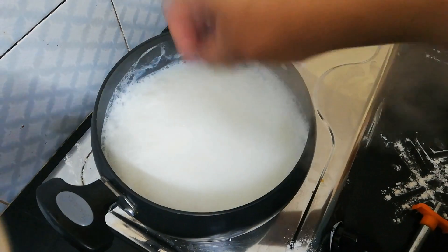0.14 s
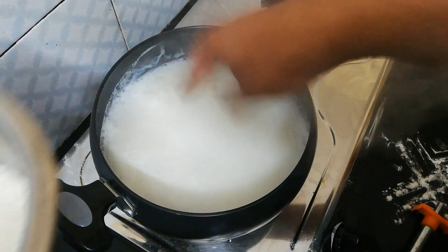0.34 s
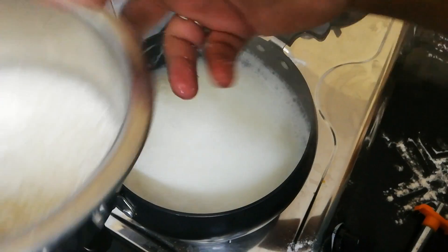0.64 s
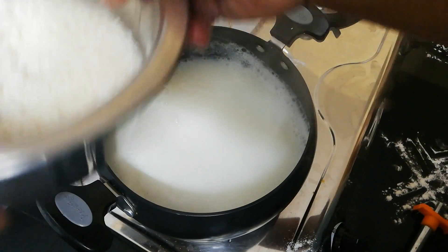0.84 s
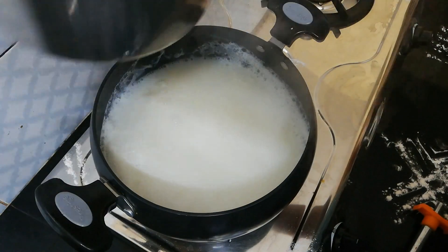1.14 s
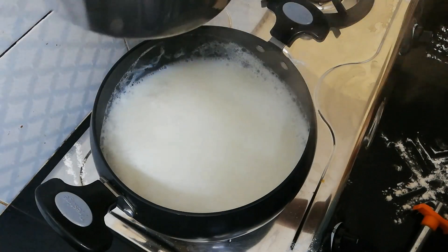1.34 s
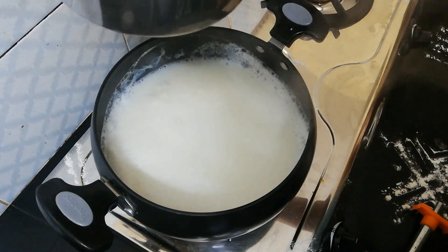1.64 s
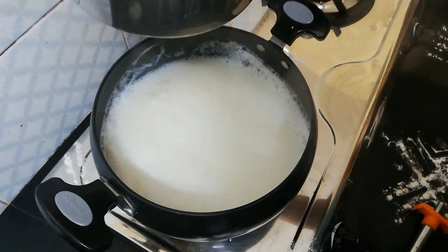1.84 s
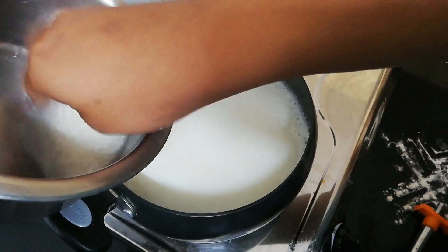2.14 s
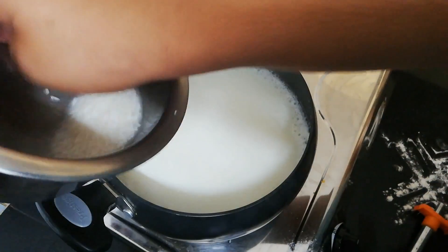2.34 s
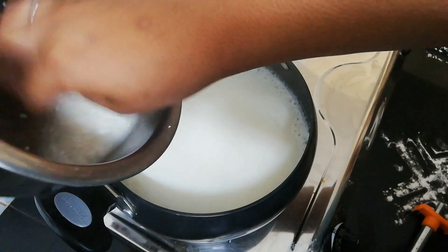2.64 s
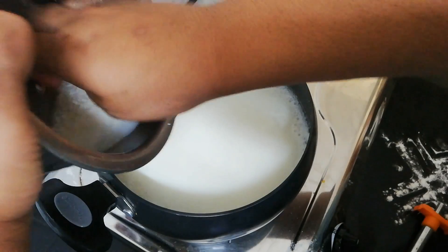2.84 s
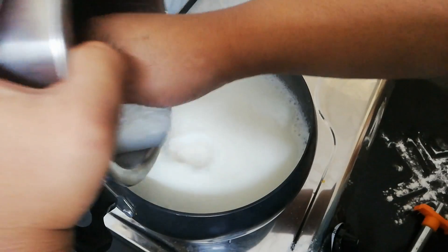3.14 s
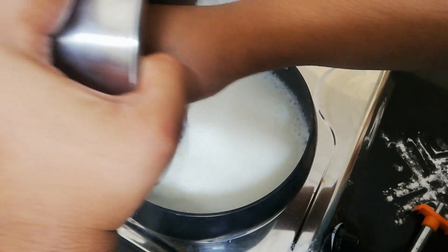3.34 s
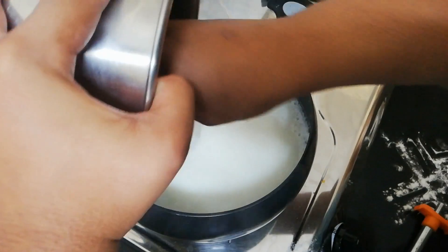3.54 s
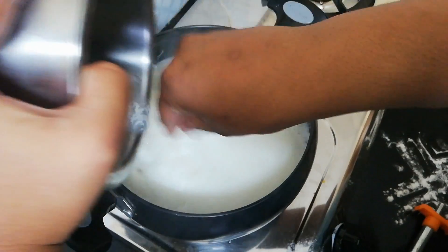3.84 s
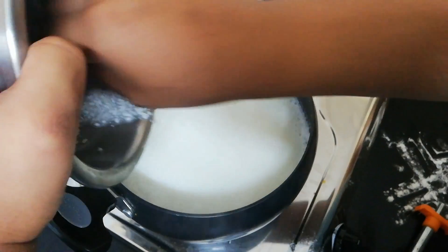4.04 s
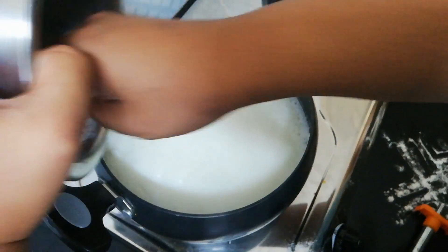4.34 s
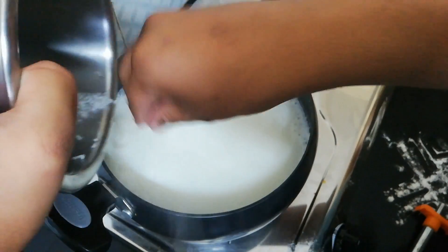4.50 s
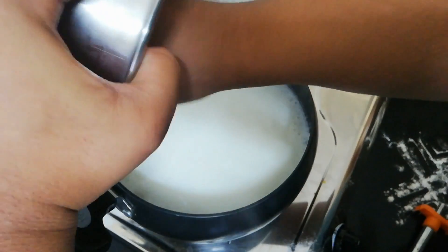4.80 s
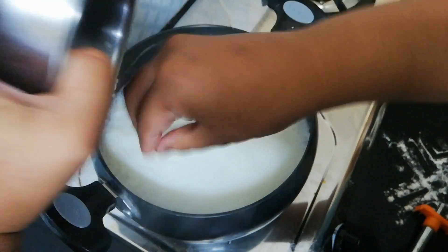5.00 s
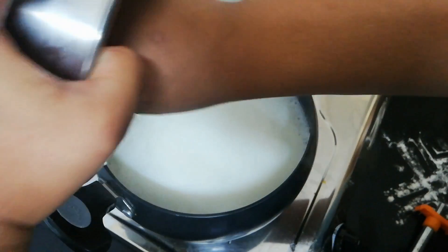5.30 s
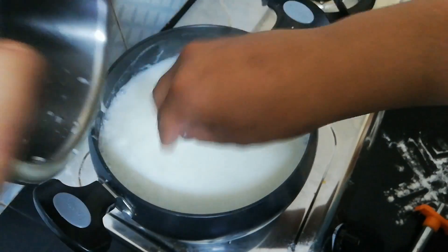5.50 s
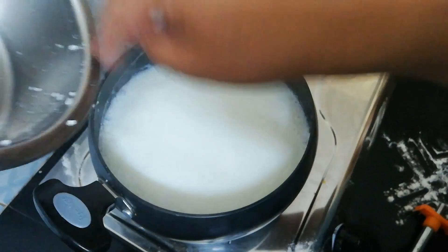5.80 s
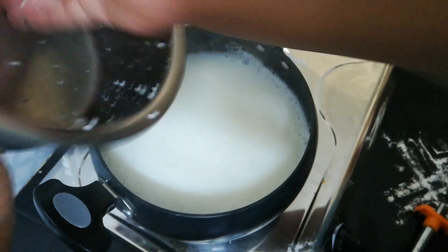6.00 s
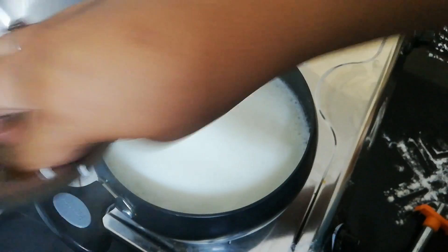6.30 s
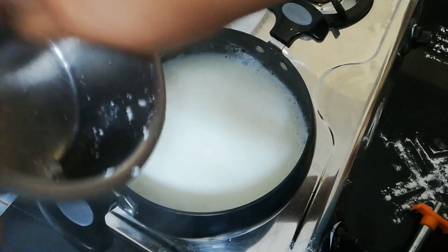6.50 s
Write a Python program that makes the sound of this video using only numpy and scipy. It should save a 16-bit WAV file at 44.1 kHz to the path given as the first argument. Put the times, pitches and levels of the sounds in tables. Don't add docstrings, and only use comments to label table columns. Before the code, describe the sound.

Close stereo in a small hard kitchen. Faint burner hiss and a dull soft thud, then a brief total drop-out. Sound returns with a wet slap and bowl clank, grainy sweeping, then dense crackling snaps and plops as rice falls into milk. Hollow bowl knocks and finger squeaks follow while a low engine drone grows outside.

```python
import sys
import numpy as np
from scipy import signal
from scipy.fft import rfft, irfft
from scipy.io import wavfile

SR = 44100
rng = np.random.default_rng(int(sys.argv[2]) if len(sys.argv) > 2 else 0)


def wrap_up_sound(samples):
    columns = np.atleast_2d(samples).T
    tamed = np.clip(columns, -1, 1)
    steps = np.round(tamed * 32767).astype(np.int16)
    wavfile.write(sys.argv[1], SR, steps)


def gain_from_db(level_db):
    decades = np.asarray(level_db, float) / 20
    return 10 ** decades


N = 293480
BED_TOP_HZ = 15950


def in_time(rows):
    s, *columns = np.transpose(rows)
    return [np.interp(np.arange(N) / SR, s, c) for c in columns]


def rms_one(x):
    return x / np.sqrt(np.mean(x ** 2) + 1e-20)


def at_hz(points, hz):
    points = np.array(points)
    return np.interp(np.log(hz), np.log(np.maximum(points[:, 0], 1)), points[:, 1])


def bins_hz():
    return np.maximum(np.fft.rfftfreq(N, 1 / SR), 1)


def lowpass(x, hz, order=2):
    return signal.sosfilt(signal.butter(order, hz, fs=SR, output="sos"), x)


def bandpass(x, edges_hz, order=2):
    return signal.sosfilt(signal.butter(order, edges_hz, "band", fs=SR, output="sos"), x)


def drift(rate):
    r = np.exp(-80 * np.pi * rate / SR)
    slow = signal.lfilter([1], [1, -2 * r, r * r], rng.standard_normal(N // 40 + 2002))[2000:]
    return np.interp(np.arange(N) / 40, np.arange(len(slow)), rms_one(slow))


def coloured(x, spectrum):
    hz = bins_hz()
    return rms_one(irfft(rfft(x) * gain_from_db(at_hz(spectrum, hz)) * (hz < BED_TOP_HZ), N))


def add(out, s, sound):
    i = round(s * SR)
    out[i:i + len(sound)] += sound[:N - i]


def spread(own, other, likeness=0.029):
    alike = np.clip(likeness, 0, 1)
    return np.array([alike * own + np.sqrt(1 - alike ** 2) * other, own])


def grains(per_s, spread_db):
    sizes = gain_from_db(spread_db * np.minimum(rng.exponential(1, N), 4)) * rng.choice([-1, 1], N)
    clicks = sizes * (rng.random(N) < per_s / SR)
    return rms_one(clicks) + 0.38 * rng.standard_normal(N)


def flame():
    # (frequency [Hz], density [dB per Hz])
    floor = [(12, -64.5), (20, -11), (96, -1.5), (131, -6), (189, -12.5), (351, -12), (404, -12),
             (599, -17), (839, -15.5), (1320, -17), (2510, -24), (7300, -24), (11100, -17), (15200, -37),
             (16500, -41)]
    # (time [s], level [dB])
    hiss_level = [(0, -62), (.15, -63.5), (.5, -64), (2.6, -64.5), (6.65, -65)]
    # (frequency [Hz], left-right likeness [-1 to 1])
    coherence = [(60, 0.97), (180, 1), (550, -0.35), (1650, 0.1), (4970, -0.094), (15000, 0.29)]
    hz = bins_hz()
    alike = np.clip(at_hz(coherence, hz), -.99, .99)
    mid, side = rfft(rng.standard_normal((2, N))) * gain_from_db(at_hz(floor, hz)) * (hz < BED_TOP_HZ)
    pair = irfft(np.sqrt(1 + alike) * mid + np.sqrt(1 - alike) * side * [[1], [-1]], N)
    hiss = bandpass(pair.mean(0), [6000, 13000], order=4)
    balance = gain_from_db([[-.7], [.7]])
    return gain_from_db(in_time(hiss_level)[0] + drift(10.0)) * balance * pair / np.std(hiss)


def engine():
    # (time [s], low order [Hz], level [dB], high order [Hz], level [dB])
    orders = [(0.0, 71.8, -77, 107, -82), (0.222, 73.5, -57, 110, -63), (0.94, 71.5, -70, 108, -74),
              (1.58, 69, -62.5, 112, -67.5), (2.2, 74.4, -51.5, 117, -65.5), (2.56, 71.5, -62.5, 113, -68),
              (2.93, 75.3, -50, 106, -62), (3.54, 71.5, -59.5, 107, -65),
              (3.796, 70.2, -50.5, 106.4, -51.5), (4.158, 71.35, -48, 104.5, -52.5),
              (4.372, 72.74, -39, 107, -53.5), (4.67, 73.4, -54, 111.5, -55.5),
              (4.786, 74.3, -41, 112.1, -55), (5.22, 73, -60, 113, -48), (5.39, 69.7, -34.5, 113, -54),
              (5.9, 68.7, -40.5, 109, -48.5), (6.2, 69.2, -35, 111, -51.5), (6.62, 70.2, -32, 111, -45.5)]
    low_hz, low_db, high_hz, high_db = in_time(orders)
    low = 2 * np.pi * np.cumsum(low_hz + .5 * drift(2.0)) / SR
    high = 2 * np.pi * np.cumsum(high_hz + drift(6.7)) / SR
    cycle = low / 5
    low_tone = np.sin(low) * (1 + 0.043 * np.cos(cycle))
    low_tone = low_tone + 0.0069 * np.sin(3 * low) * (1 + 6.6 * np.cos(cycle))
    throb = 1 + 0.5 * np.cos(cycle) + 0.6 * np.cos(2 * cycle + 1)
    high_tone = np.sin(high) * throb * gain_from_db(1.8 * drift(21) + 1.8 * drift(6.5))
    shake = rms_one(bandpass(rng.standard_normal(N), [15, 55]))
    sound = gain_from_db(low_db - 1.5) * low_tone + gain_from_db(high_db + 3.5) * high_tone
    sound = sound + gain_from_db(0.51 * high_db - 34.0) * shake
    return np.array([np.roll(sound, round(0.00034 * SR)), sound])


def kitchen(x):
    t60_s, treble_t60_s = 0.32, 0.16
    t = np.arange(SR // 2) / SR
    white = rng.standard_normal((2, len(t))) * np.minimum(t / .006, 1)
    low = lowpass(white, 5100, order=1)
    tail = low * gain_from_db(-60 * t / t60_s) + (white - low) * gain_from_db(-60 * t / treble_t60_s)
    tail = tail / np.sqrt((tail ** 2).sum(1, keepdims=True))
    return signal.fftconvolve(x[None], tail, axes=1)[:, :N]


def thuds():
    # (time [s], peak [dB], pitch [Hz], t60 [s], rise [s])
    dull_knocks = [(0.345, -43, 164.4, 0.7, 0.038), (0.35, -48, 343.6, 0.5, 0.037),
                   (0.411, -66, 1150, 0.055, 0.0036), (2.3005, -16.5, 2430, 0.019, 0.001),
                   (5.2325, -2, 680, 0.014, 0.0024), (5.233, -32.5, 380, 0.28, 0.0026),
                   (5.233, -41, 402, 0.22, 0.0043), (0.349, -52.5, 241, 0.4, 0.028),
                   (2.313, -39, 302, 0.025, 0.0036), (2.348, -42.5, 208, 0.032, 0.0036),
                   (4.135, -30, 1150, 0.031, 0.0015), (4.763, -31.5, 1150, 0.022, 0.0023),
                   (6.035, -32.5, 408, 0.056, 0.0038), (3.64, -39, 295, 0.048, 0.004)]
    out, t = np.zeros(N), np.arange(SR // 2) / SR
    for s, db, hz, t60, rise in dull_knocks:
        add(out, s, gain_from_db(db - 60 * t / t60) * np.minimum(t / rise, 1) * np.sin(2 * np.pi * hz * t))
    return out


def rim():
    # (frequency [Hz], level [dB], t60 [s])
    rim_modes = [(2050, 3, 0.028), (2490, -7.5, 1.6), (3090, -0.5, 0.037), (4104, -5.5, 0.082),
                 (4380, -30.5, 0.089), (5200, -9, 0.096), (5750, -19, 0.11), (6150, -0.5, 0.068)]
    hit_s, hit_db, choke_s = 2.3168, -23.5, .06
    out, t = np.zeros(N), np.arange(SR // 4) / SR
    for (hz, db, t60), near in zip(rim_modes, rng.uniform(-0.044, 0.049, len(rim_modes))):
        pair = np.sin(2 * np.pi * hz * t) + 0.59 * np.sin(2 * np.pi * hz * (1 + near) * t)
        fade = gain_from_db(hit_db + db - 60 * t / min(t60, choke_s))
        add(out, hit_s, fade * np.minimum(t / 0.0024, 1) * pair)
    return out


def knocks():
    # (time [s], peak [dB], brightness [dB per octave], damping by the hand [0-1])
    hits = [
        (2.316, -25.5, -3.5, 1),
        (2.35, -48, -28, 0.5),
        (4.119, -23.5, 1.5, 1),
        (4.135, -25.5, 2, 0.66),
        (4.75, -32.5, 11, 0.9),
        (4.765, -39, -3, 1),
        (5.233, -21, -2, 0.06),
        (5.30, -31, -9.5, 0),
        (6.033, -25, 1, 0),
        (6.056, -35.5, -10.5, 0),
    ]
    # (frequency [Hz], level [dB], t60 [s])
    modes = [(303, -7, 0.47), (366, -5, 0.57), (402, -0.5, 0.082), (536.6, -7, 0.35), (653.4, 14, 0.15),
             (710, 5, 0.48), (835, 1.5, 0.19), (1150, -5.5, 0.059), (1364, -6, 0.57), (1480, 10, 0.072),
             (1532, 3.5, 0.2), (1540, -15, 0.55), (1670, -25.5, 0.25), (1700, -9, 0.33)]
    thud_t60_s, ring_share = 0.041, 0.26
    out, t = np.zeros(N), np.arange(SR // 3) / SR
    luck = rng.normal(0, 1.0, (len(hits), len(modes)))
    rattle = rms_one(lowpass(rng.standard_normal((len(modes), SR)), 70))
    for k, ((s, db, tilt_db, damping), row) in enumerate(zip(hits, luck)):
        ring = 0
        for (hz, mode_db, t60), extra_db, rough in zip(modes, row, rattle[:, 2000 * k + 2000:]):
            lasts = min(t60, .45) * (1.5 - np.clip(damping, 0, 1))
            roughness = .35 + .9 * rough[:len(t)]
            fade = gain_from_db(-60 * t / thud_t60_s) + ring_share * roughness * gain_from_db(-60 * t / lasts)
            level = gain_from_db(mode_db + extra_db + tilt_db * np.log2(hz / 700))
            ring = ring + level * fade * np.sin(2 * np.pi * hz * t)
        ring = ring * (1 - np.exp(-t / 0.0026))
        add(out, s, gain_from_db(db - 2.5) * ring / np.abs(ring).max())
    return out


def plops():
    # (time [s], peak [dB], pitch [Hz], ring t60 [s])
    pockets = [(0.847, -48, 836, 0.021), (2.424, -35, 760, 0.026), (2.883, -48, 666, 0.049),
               (3.233, -39.5, 1170, 0.036), (3.294, -43.5, 760, 0.04), (3.314, -32.5, 776, 0.022),
               (3.607, -44, 724, 0.013), (3.923, -34.5, 840, 0.016), (3.89, -36.5, 2600, 0.016),
               (3.698, -22, 3030, 0.012), (3.707, -39, 1120, 0.019), (3.384, -34, 750, 0.023),
               (3.448, -21.5, 725, 0.017), (3.476, -37, 595, 0.02), (3.505, -36, 850, 0.019),
               (3.535, -23.5, 710, 0.012), (3.544, -46, 2150, 0.029), (3.575, -25, 734, 0.019),
               (3.636, -22, 680, 0.013), (3.697, -19.5, 830, 0.007), (3.788, -28, 825, 0.026),
               (3.919, -40.5, 1995, 0.046), (3.956, -30.5, 924, 0.015), (3.999, -39.5, 775, 0.019),
               (4.608, -41, 1950, 0.026), (4.647, -46, 1150, 0.048), (6.169, -49, 1220, 0.037),
               (3.694, -29.5, 2277, 0.026)]
    out, t = np.zeros(N), np.arange(8192) / SR
    opening = 1 - np.exp(-(t / .0015) ** 2)
    for (s, db, hz, t60), (ratio, creep, late) in zip(pockets, rng.random((len(pockets), 3))):
        phase = 2 * np.pi * hz * (t + creep * t * t)
        beside = np.sin((.85 + .35 * ratio) * phase) * np.clip(t / (.001 + .004 * late), 0, 1.5)
        fade = gain_from_db(-60 * t / np.clip(.75 * t60, .008, .03))
        add(out, s, gain_from_db(db + 9.0) * (np.sin(phase) + .55 * beside) * opening * fade)
    return out


def drag():
    # (start [s], end [s], first pitch [Hz], last pitch [Hz], level [dB])
    streaks = [(2.32, 2.57, 860, 870, -59), (2.88, 2.966, 840, 810, -67), (3.168, 3.218, 2147, 2300, -51),
               (3.235, 3.329, 1200, 1200, -52.5), (3.424, 3.726, 210, 380, -66.5),
               (3.8, 4.05, 820, 1000, -63), (3.5, 3.754, 2163, 1900, -54),
               (3.489, 3.855, 1404, 1500, -53.5), (4.6, 4.687, 2100, 1600, -58),
               (4.75, 4.88, 2600, 2600, -57.5), (4.95, 5.115, 2150, 2200, -64),
               (4.137, 4.364, 1400, 710, -70), (4.857, 4.978, 8900, 9430, -47.5),
               (4.859, 4.978, 5500, 5500, -56.5), (5.252, 5.487, 682, 760, -50.5),
               (5.24, 5.386, 650, 1500, -74), (6.035, 6.118, 4600, 1800, -69), (6.17, 6.3, 2300, 2500, -55),
               (6.18, 6.33, 3100, 2900, -61), (6.2, 6.389, 2700, 2600, -57.5),
               (6.042, 6.062, 3200, 4200, -53), (3.376, 3.45, 4700, 2900, -47.5),
               (2.135, 2.2, 6700, 4000, -59), (3.79, 3.9, 950, 870, -56.5), (5.03, 5.075, 1800, 2000, -70),
               (6.26, 6.38, 1500, 4100, -69), (2.33, 2.5, 1400, 1600, -54.5), (3.294, 3.37, 1400, 570, -53),
               (6.07, 6.11, 1000, 1000, -58), (6.08, 6.1, 3700, 3300, -61), (2.301, 2.316, 3800, 2230, -51),
               (4.14, 4.27, 870, 1400, -68), (4.195, 4.36, 4600, 6800, -57)]
    # (start [s], end [s], first pitch [Hz], last pitch [Hz], level [dB])
    sings = [(4.645, 4.745, 1210, 1200, -55.5), (4.70, 4.76, 2400, 2480, -54),
             (4.76, 4.88, 2830, 2900, -61.5), (4.76, 4.87, 2500, 2200, -60),
             (4.908, 5.035, 2110, 2100, -53), (4.92, 5.10, 1950, 1880, -57),
             (4.84, 4.925, 1540, 1510, -65.5), (5.02, 5.07, 2100, 2350, -57),
             (6.045, 6.14, 1500, 1380, -60), (6.05, 6.145, 720, 650, -56), (6.125, 6.22, 2150, 2350, -55.5),
             (6.05, 6.13, 3300, 3200, -62), (2.695, 2.735, 1400, 1400, -64.5),
             (2.14, 2.21, 3500, 2950, -61)]
    out = np.zeros(N)
    rough = np.array([grains(900, 4.5), grains(900, 4.5)])
    rows = [(*row, 95 * (1 + (row[2] / 2600) ** 2)) for row in streaks]
    rows += [(*row, 50) for row in sings]
    for start, end, first_hz, last_hz, db, width_hz in rows:
        i, length = round(start * SR), round((end - start) * SR)
        slow = lowpass(rough[:, i:i + length], width_hz)
        phase = 2 * np.pi * np.cumsum(np.linspace(first_hz, last_hz, length)) / SR
        stroke = np.sin(np.pi * np.linspace(0, 1, length) ** 0.44) ** 0.55
        carried = slow[0] * np.cos(phase) + slow[1] * np.sin(phase)
        add(out, start, gain_from_db(db) * stroke * rms_one(carried))
    return out


def strokes():
    # (peak time [s], patter [dB], rise [s], fall [s], low share [dB])
    hand = [(2.15, -54, 0.078, 0.29, 0), (2.4, -48.5, 0.062, 0.23, 3), (2.53, -49.5, 0.12, 0.092, -17),
            (2.718, -53, 0.014, 0.019, 1), (2.862, -56.5, 0.063, 0.18, 1), (3.21, -44, 0.039, 0.24, 0.4),
            (3.378, -47, 0.012, 0.84, 1.5), (3.724, -38, 0.21, 0.13, -0.5), (3.84, -53.5, 0.05, 0.079, 2),
            (3.888, -53.5, 0.023, 0.39, -3.5), (4.132, -49, 0.028, 0.034, 8),
            (4.191, -36, 0.004, 0.079, -14), (4.3, -43.5, .1, 0.14, -8.5), (4.616, -48, 0.06, 0.061, -3),
            (4.84, -67, 0.039, 0.35, 12.5), (5.197, -42, 0.024, 0.043, 0), (5.23, -43, 0.0078, 0.07, 5),
            (5.432, -52, 0.078, 0.042, -5.5), (6.035, -51.5, 0.0076, 0.073, 7),
            (6.214, -51.5, 0.22, 0.28, 1), (6.48, -57.5, 0.14, 0.073, -19)]
    t = np.arange(0, N + 16, 16) / SR
    s, db, rise, fall, low_db = np.array(hand).T[:, :, None]
    swell = np.clip(np.where(t < s, 1 + (t - s) / rise, 1 - (t - s) / fall), 0, 1)
    power = (gain_from_db(db) * swell) ** 2
    return [np.interp(np.arange(N) / SR, t, np.sqrt(p.sum(0))) for p in (power, power * gain_from_db(2 * low_db))]


def sweep():
    # (frequency [Hz], density [dB per Hz])
    patter = [(1500, -50), (3000, -22), (4000, -5), (5500, -1.5), (7000, -3), (9500, 2), (11500, -4),
              (14000, 4), (16500, -8)]
    # (frequency [Hz], density [dB per Hz])
    wipe = [(1500, -50), (3000, -27), (4200, -9.5), (5500, 0.5), (6900, -6), (9000, 6.5), (11500, -0.5),
            (14500, -3.5)]
    bright_gain, dull_gain = strokes()
    coarse = coloured(grains(3500, 7.3), patter)
    fine = coloured(grains(5000, 4.3), wipe)
    together = drift(59)
    empty = np.arange(N) > 4.15 * SR
    edges, bright = np.geomspace(2500, 16000, 9), 0
    for k, band in enumerate(zip(edges, edges[1:])):
        pair = [np.where(empty, np.roll(fine, shift), np.roll(coarse, shift))
                for shift in (9001 * k, 9001 * k + SR)]
        bright = bright + spread(*bandpass(pair, band)) * gain_from_db(2.8 * drift(14) + 1.3 * together)
    dull = bandpass(grains(1200, 2.8), [1700, 4500])
    dull = spread(dull, np.roll(dull, SR)) * gain_from_db(-10.0 + 2.8 * drift(37)) / np.std(dull)
    return gain_from_db(2.0) * (bright_gain * rms_one(bright) + dull_gain * dull)


def snaps():
    # (time [s], peak [dB], centre [Hz], width [octaves])
    pour = [(3.195, -38.5, 7360, 0.3), (3.207, -37.5, 4600, 0.37), (3.238, -21, 7260, 0.81),
            (3.2915, -12, 6760, 0.62), (3.2338, -29.5, 5060, 0.48), (3.3507, -39, 5150, 0.43),
            (3.3759, -34.5, 3970, 0.45), (3.385, -28, 7000, 0.46), (3.299, -31, 11000, 0.77),
            (3.505, -33, 9500, 0.87), (3.646, -31, 4140, 0.58), (3.7365, -12, 8500, 1),
            (3.778, -28, 9100, 0.73), (3.916, -29, 11000, 0.55), (3.574, -39, 13000, .4),
            (3.389, -29, 7000, 1.3), (3.413, -26, 8000, 1.3), (3.447, -33, 10500, 0.58),
            (3.5007, -28.5, 4600, 0.65), (3.529, -18.5, 10200, 3.2), (3.575, -29, 5070, 0.51),
            (3.6117, -25, 7300, 0.41), (3.636, -13, 7200, 1.5), (3.687, -28, 9500, 0.66),
            (3.6975, -13, 10400, 0.83), (3.1743, -43, 5030, .3), (3.199, -32, 12000, 0.87),
            (3.222, -36, 6000, .4), (3.255, -38, 8300, .4), (3.314, -35, 8000, 0.54),
            (3.535, -26, 8600, 0.89), (3.728, -28, 7000, 0.76), (4.2484, -30, 10300, 0.39),
            (4.2813, -30, 9000, 1.2), (4.295, -27, 10000, 0.63), (4.35, -35, 10400, 0.52),
            (3.7341, -15.5, 7050, 0.47), (3.7873, -22, 6830, 0.85), (3.705, -22.5, 7400, 0.3),
            (3.8136, -22, 11300, 0.58), (3.8902, -20.5, 7360, 1.3), (3.9239, -15.5, 8200, 1.26),
            (3.955, -24.5, 6460, 0.99), (3.964, -22, 10600, 0.71), (4.0277, -41, 6500, 0.57),
            (4.0905, -24, 5960, 0.29), (4.135, -32.5, 10400, 0.57), (4.207, -22, 9700, 0.35),
            (4.1182, -34, 3180, 1.06)]
    # (time [s], peak [dB], centre [Hz], width [octaves])
    stray = [(2.103, -36.5, 8800, 0.34), (2.3, -32, 3600, 1.3), (2.516, -31.5, 10300, 0.63),
             (2.3, -42, 7050, 0.41), (4.5941, -18, 7800, 0.89), (4.647, -28, 6000, 2.4),
             (4.751, -30.5, 8900, 1.5), (4.752, -41, 2560, .5), (4.876, -33, 8000, 1.5),
             (5.0108, -37.5, 8800, 0.55), (4.1, -49, 4100, 0.66), (4.58, -51, 2200, .5),
             (6.307, -45, 3500, 0.44), (2.3145, -29, 1970, 0.96), (2.695, -44.5, 870, 1.2),
             (6.0796, -36.5, 6800, 0.61), (6.1673, -19, 6900, 1.3), (2.455, -27, 10300, .8),
             (2.545, -37, 10800, .4), (2.4, -42, 8100, 0.25), (5.3, -34, 10500, 0.45),
             (0.058, -39, 10500, .6), (6.31, -42, 4550, 0.34), (6.3085, -25, 9800, .7),
             (6.313, -31, 7500, 1.6), (7.5, -37, 9700, 0.26)]
    # (time [s], peak [dB], centre [Hz], width [octaves], swell [ms])
    slaps = [
        (0.334, -43, 3800, 4.1, 9.9),
        (0.853, -41.5, 9450, 1.5, 10),
        (2.3165, -12, 9200, 0.7, 2.05),
        (2.3184, -14, 6500, 0.9, 1.5),
        (3.6939, -14, 9300, 1.7, 3.5),
        (4.1875, -15, 9260, 0.6, 0.6),
        (4.186, -35, 4080, 0.45, 1.1),
        (5.181, -26.5, 9200, 0.63, 1.9),
        (5.235, -33, 11500, 0.43, 2.5),
        (5.409, -40, 9350, 0.31, 4.1),
    ]
    out, t = np.zeros((N, 2)), np.arange(4096) / SR
    rows = [(*row, .6, 0.038) for row in [*pour, *stray]]
    rows += [(*row, 0.066) for row in slaps]
    noise = rng.standard_normal((len(rows), 2, 4096))
    for (s, db, hz, octaves, rise_ms, t60), pair in zip(rows, noise):
        edges = np.clip(hz * 2 ** (np.array([-.5, .5]) * 1.27 * octaves), 300, 17000)
        after = t * 1000 / np.clip(rise_ms / min(octaves, 1), .1, 8)
        swell = (after * np.exp(1 - after)) ** 2
        spray = 0.18 * np.minimum(after, 1) ** 2 * gain_from_db(-60 * t / max(t60, .004))
        shape = swell + spray
        crack = 5.5 * min(octaves, 1) * (np.arange(len(t)) == shape.argmax())
        spit = bandpass(spread(*pair, likeness=0.24) * shape + crack, edges, order=3)
        add(out, s, gain_from_db(db + 4.0) * spit.T / np.abs(spit).max())
    return out.T


def scene():
    # (frequency [Hz], left minus right [dB])
    ports = [(150, 1), (300, -3), (600, 0), (1100, -1), (2200, 2), (4500, -1.5), (8000, -2.5),
             (12500, -11.5)]
    # (frequency [Hz], level [dB])
    mic_top = [(11500, -1.5), (13500, -17), (16000, -17), (16800, -63)]
    # (delay [s], left [dB], right [dB])
    echoes = [
        (.0011, -16.5, -102),
        (.0023, -18, -14),
        (.0037, -12, -46),
        (.0058, -46, -12),
    ]
    left_lag_s = 28 / 44100
    near = snaps() + sweep() + plops() + knocks() + thuds() + drag() + rim()
    hz = bins_hz()
    half = gain_from_db(at_hz(ports, hz) / 2)
    spectrum = rfft(near) * gain_from_db(at_hz(mic_top, hz))
    paths = 1
    for s, left_db, right_db in echoes:
        paths = paths + gain_from_db([[left_db], [right_db]]) * np.exp(-2j * np.pi * hz * s)
    direct = irfft(spectrum * paths * [half * np.exp(-2j * np.pi * hz * left_lag_s), 1 / half], N)
    return direct + gain_from_db(-8) * kitchen(irfft(spectrum[1], N)) + flame() + engine()


def roll_off(x):
    return signal.sosfilt(signal.butter(12, 16640, fs=SR, output="sos"), x)


def record(dry):
    ceiling, drop_start_s, drop_end_s = .36, 1.832, 2.0496
    t = np.arange(N) / SR
    offset = -0.03 * np.exp(-np.maximum(t - drop_end_s, 0) / 0.12) * (t >= drop_end_s)
    live = (t < drop_start_s) | (t >= drop_end_s)
    mix = ceiling * np.tanh(dry / ceiling) * live + offset
    return roll_off(mix)


dry = scene()
out = record(dry)
wrap_up_sound(out)
```